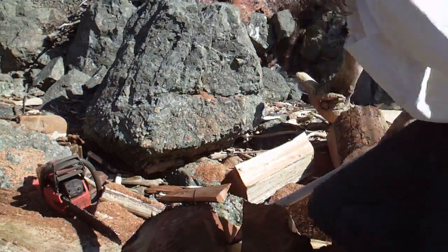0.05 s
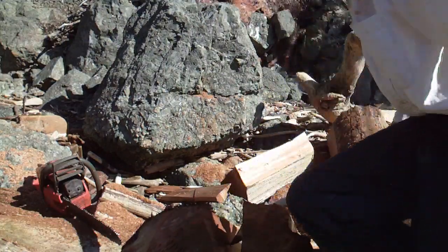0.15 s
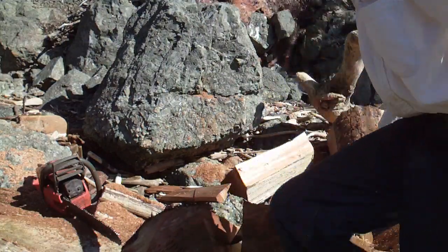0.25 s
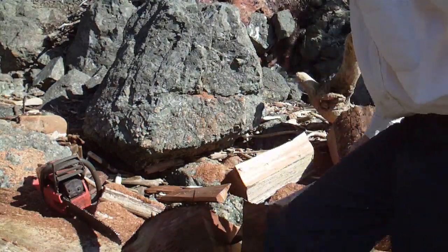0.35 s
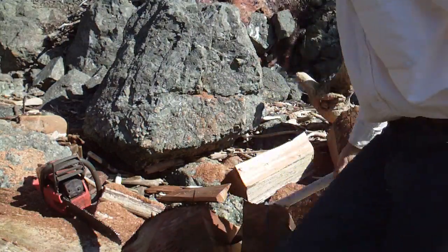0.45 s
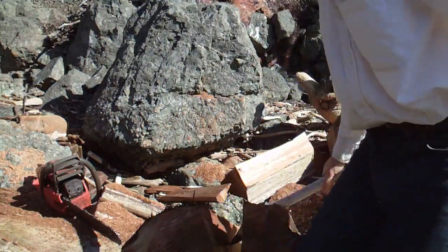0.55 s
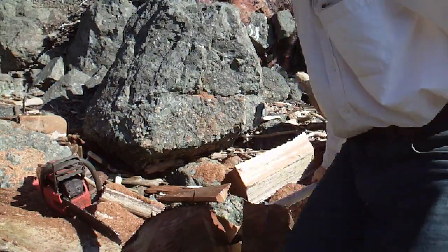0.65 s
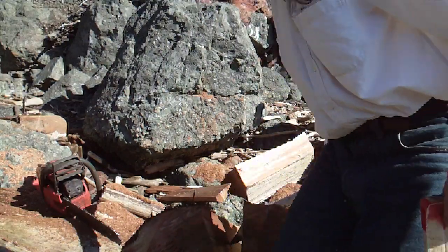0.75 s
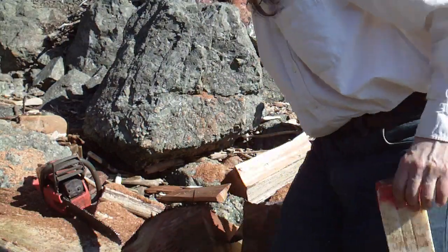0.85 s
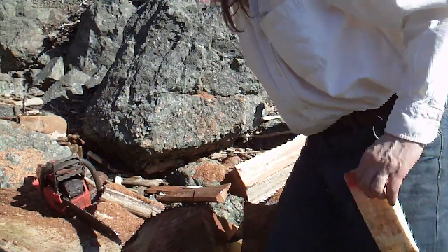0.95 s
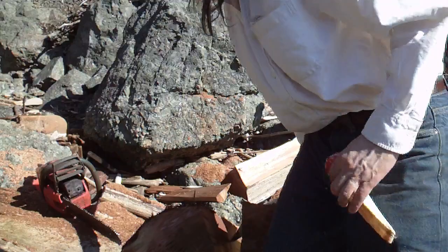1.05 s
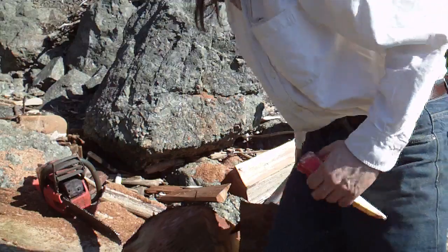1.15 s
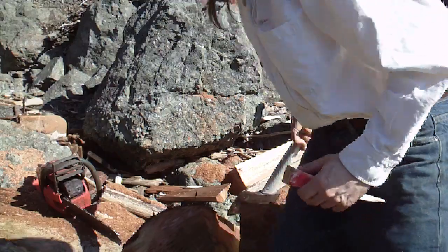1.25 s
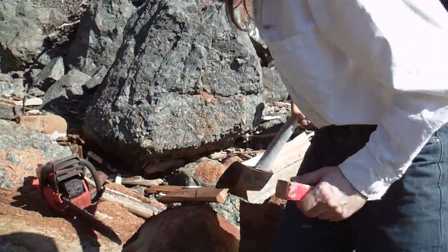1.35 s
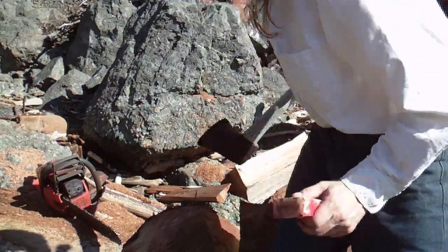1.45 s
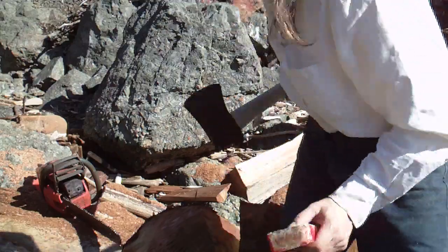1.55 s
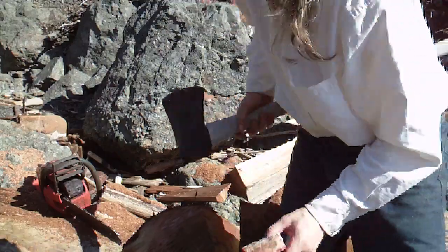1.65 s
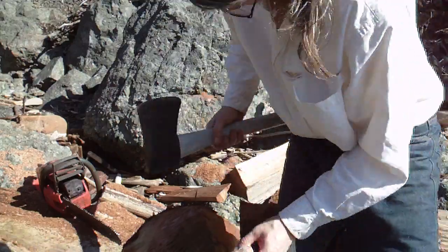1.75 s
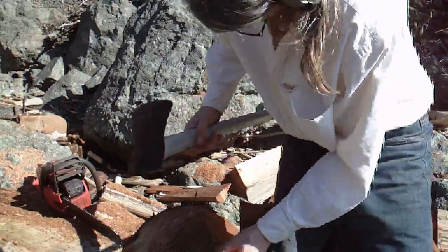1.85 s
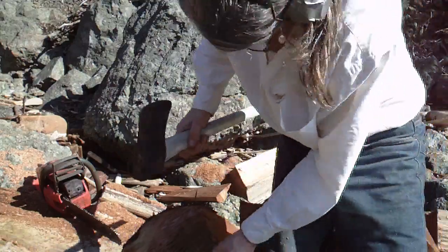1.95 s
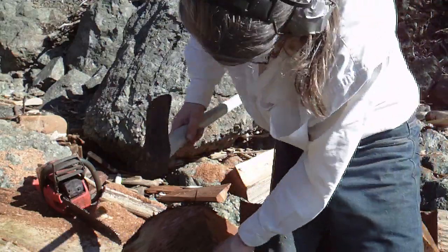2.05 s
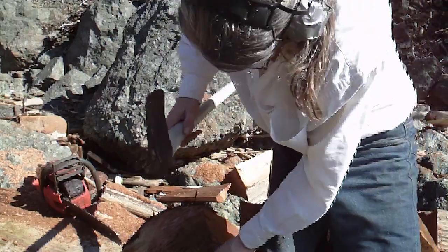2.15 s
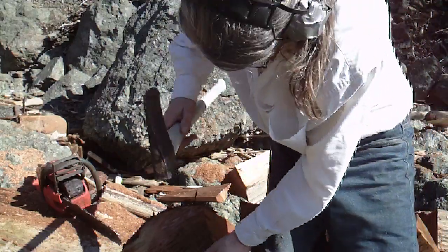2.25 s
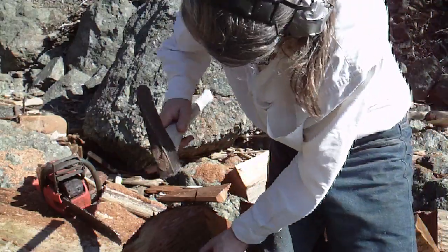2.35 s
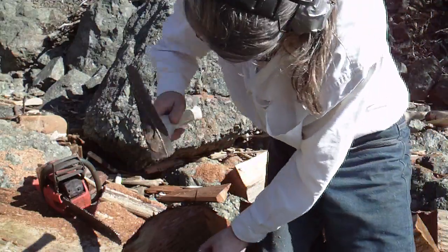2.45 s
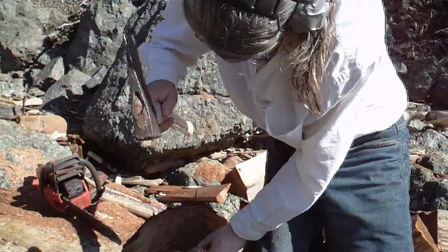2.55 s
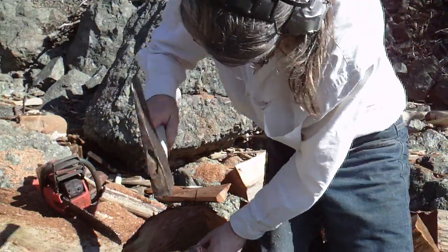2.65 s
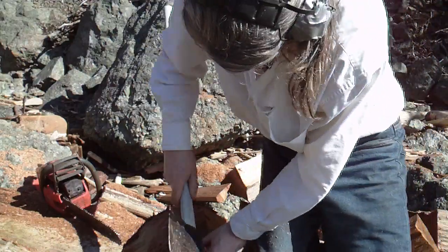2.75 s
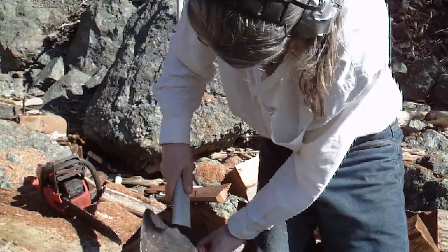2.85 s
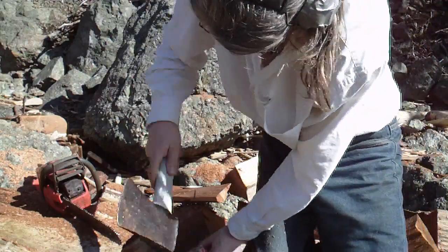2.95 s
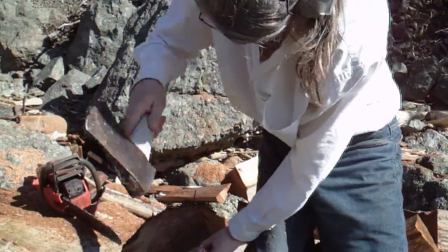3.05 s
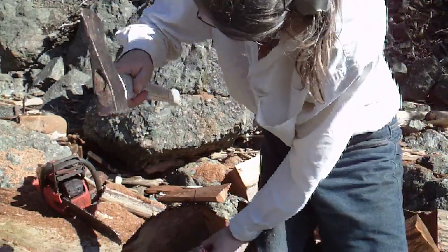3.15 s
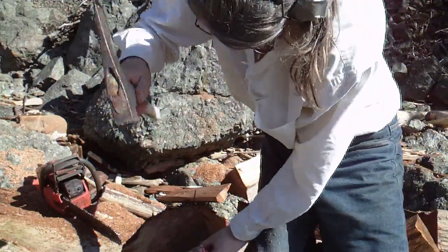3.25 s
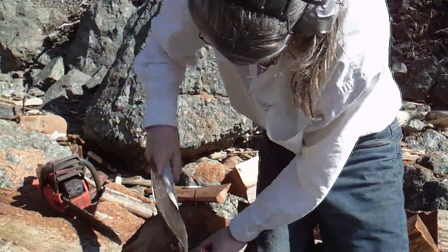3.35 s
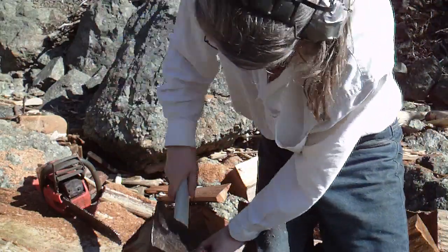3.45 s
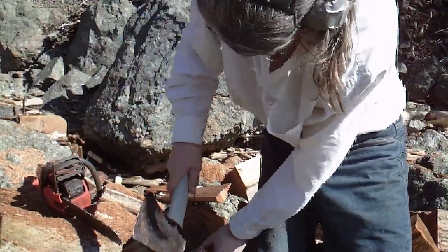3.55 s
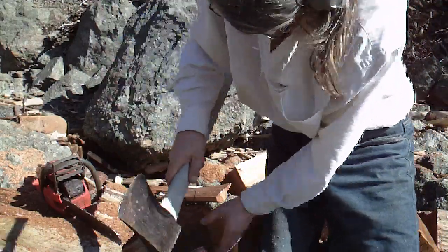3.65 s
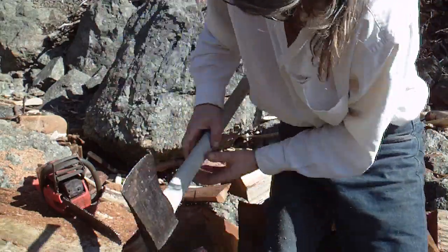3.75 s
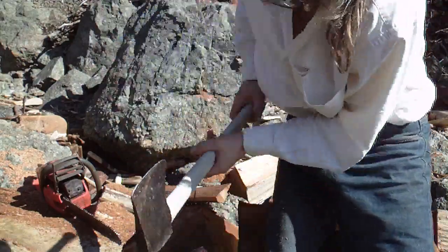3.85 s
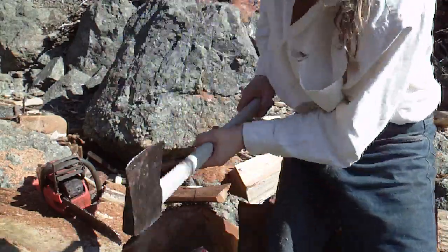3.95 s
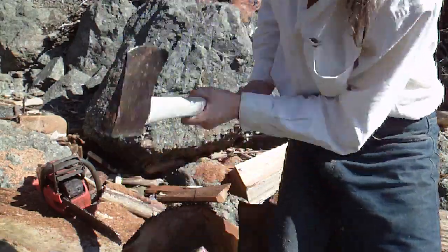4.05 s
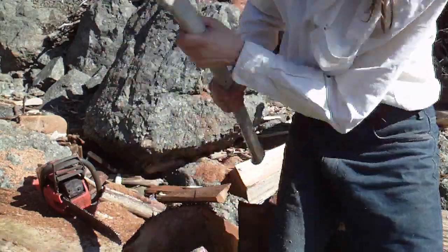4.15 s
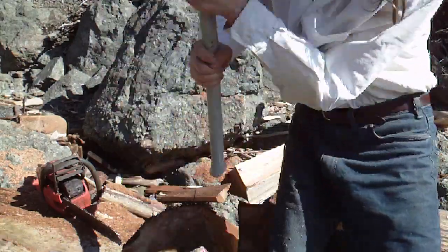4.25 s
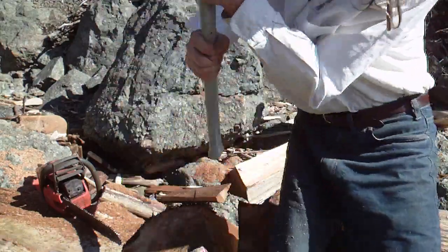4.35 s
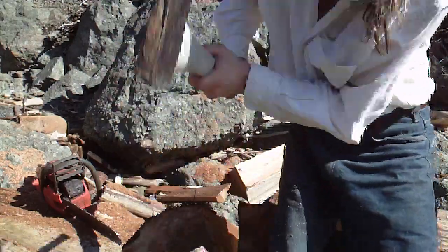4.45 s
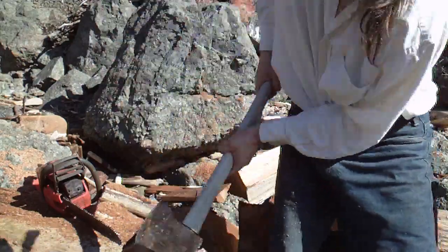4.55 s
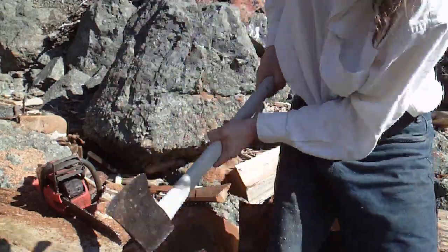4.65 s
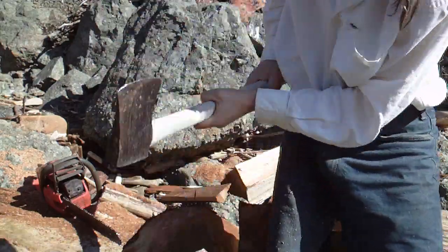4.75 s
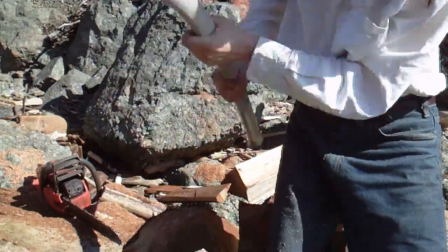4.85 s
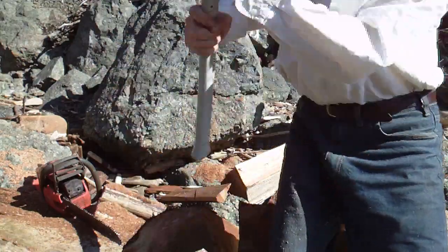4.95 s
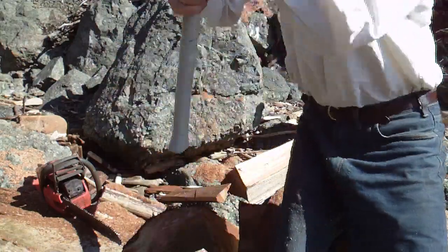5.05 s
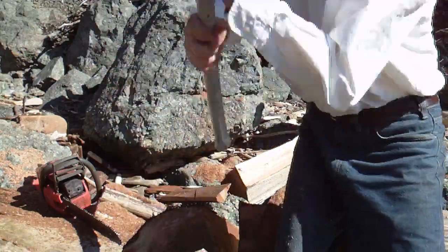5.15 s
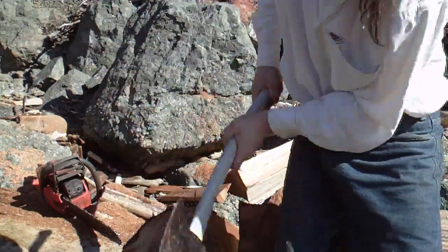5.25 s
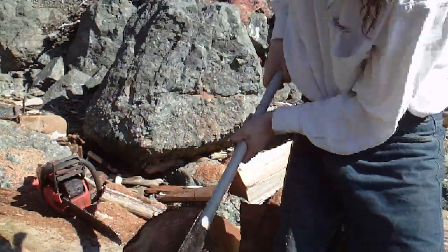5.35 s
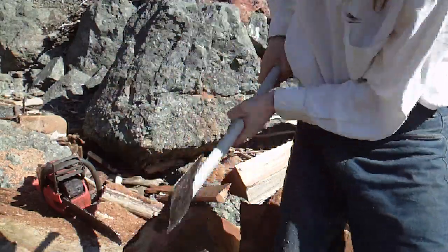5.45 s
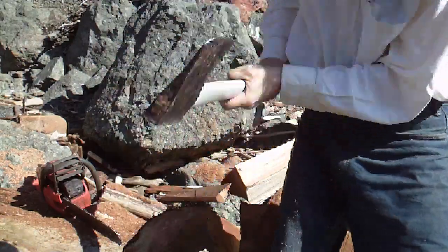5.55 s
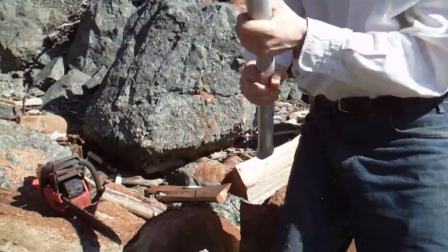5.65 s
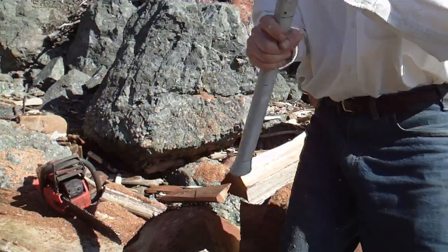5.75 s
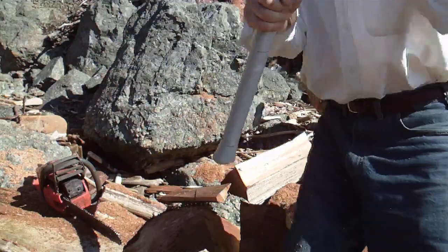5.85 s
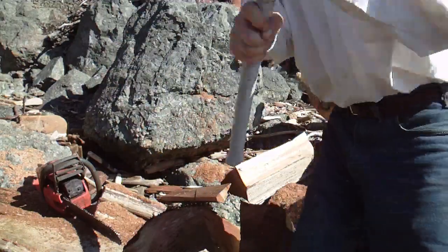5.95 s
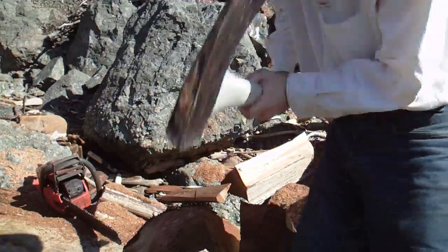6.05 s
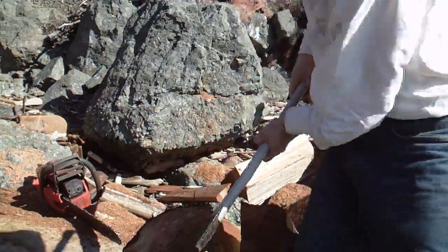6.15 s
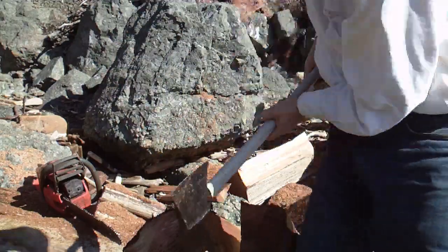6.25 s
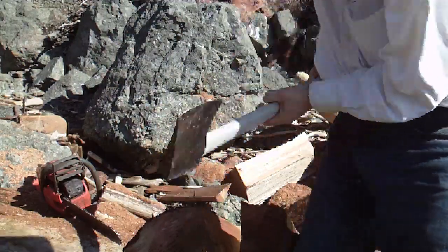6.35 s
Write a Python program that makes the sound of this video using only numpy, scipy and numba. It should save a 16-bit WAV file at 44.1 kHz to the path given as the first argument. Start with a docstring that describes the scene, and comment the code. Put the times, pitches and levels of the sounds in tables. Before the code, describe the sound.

Wood pieces knock and cloth rustles, then five sharp, overloaded hatchet chops crack into wood outdoors, echoing off rocks over soft surf.

```python
"""Hatchet on a beach

A hatchet splits cedar blocks among boulders, close to a small camera. Wood pieces knock and cloth rustles first;
five chops, built from damped modes and torn noise, overload the input and echo off rocks and far shore.
Gain control then ducks the filtered-noise surf, the low drone and the camera's own hiss and ticking.
"""
import sys
import numpy as np
from scipy import signal
from scipy.io import wavfile
from scipy.ndimage import uniform_filter1d
from numba import njit

SR = 44100
rng = np.random.default_rng(int(sys.argv[2]) if len(sys.argv) > 2 else 0)


def unload_audio(sound):
    """Save the sound as a 16-bit wav file, at the path given as the first command line argument."""
    columns = np.transpose(np.atleast_2d(sound))
    # keep every value between -1 and 1, then stretch to whole-number steps
    steps = np.round(np.clip(columns, -1, 1) * 32767)
    wavfile.write(sys.argv[1], SR, steps.astype(np.int16))


N = 281799
T = np.arange(N) / SR

# All levels are ahead of the gain control.
# Surf spectrum. Each row: frequency in Hz, relative density in dB per Hz.
SURF_SPECTRUM = [(25, 11.5), (50, 1), (90, 0), (140, -3), (250, -13.5), (600, -16), (1200, -23.5),
                 (2200, -24), (4000, -31.5), (7000, -32), (10000, -43.5), (12000, -37), (14500, -36.5)]
SURF_DB = -42
# Drone level. Each row: time in seconds, level in dB.
DRONE_LEVELS = [(0.0, -39.5), (0.73, -45), (1.8, -45), (2.1, -50.5), (3.06, -43), (3.4, -55.5),
                (3.83, -60.5), (4.3, -45.5), (5.05, -58), (5.5, -39.5), (5.65, -50.5), (6.39, -40)]
DRONE_HZ, DRONE_WIDTH_HZ, DRONE_STEADY_DB = 77, 13, 0
CAMERA_HZ, CAMERA_PULSES_PER_S, CAMERA_START_S, CAMERA_DB = 7800, 10, .05, -58
# Cloth and hands moving. Each row: loudest at in seconds, rise in seconds, fall in seconds,
# dull rustle in dB, bright rustle in dB.
MOVES = [(.015, 0.19, .1, -40, -60), (.1, .1, .2, -48, -60), (.22, 0.056, 0.25, -46, -58),
         (.72, 0.14, 0.28, -44, -56), (.97, 0.073, 0.14, -49.5, -56), (1.2, 0.2, .08, -47, -59),
         (1.3, 0.088, 0.071, -39.5, -49), (1.6, 0.31, 0.22, -46, -59.5), (1.82, 0.16, 0.54, -54, -64),
         (2.6, 0.27, .4, -55.5, -68), (4.03, 0.13, 0.21, -40.5, -60), (4.22, 0.21, 0.28, -48.5, -58),
         (4.62, 0.14, 0.059, -44, -69), (5.17, 0.23, 0.28, -42.5, -63), (5.359, .2, 0.073, -40, -61),
         (5.65, .2, .2, -50, -56), (5.91, .1, .15, -38, -52), (6.101, 0.25, 0.9, -44, -59.5)]
# Colour of the dull rustle. Each row: centre in Hz, width in Hz, relative level in dB.
CLOTH_PEAKS = [(445, 680, 1.5), (1340, 600, 3.5), (2730, 1400, -7)]
# Bright ticks of grit and splinters. Each row: start in seconds, peak in dB, centre in Hz, width in Hz,
# decay length in seconds.
TICKS = [(.005, -34.5, 1670, 1130, 0.013), (0.091, -27, 7700, 9050, 0.0038),
         (0.245, -26.5, 2740, 4760, 0.0042), (0.52, -34, 8000, 9000, 0.0025),
         (0.733, -29, 2800, 4850, 0.0035), (1.027, -29, 5900, 7000, 0.0025),
         (1.267, -34, 3000, 7000, 0.0016), (3.319, -38, 2200, 1800, 0.0046),
         (5.255, -27.5, 4020, 9100, 0.0067)]
# Small knocks of wood. Each row: start in seconds, clack in dB, clack in Hz, thump in dB, thump in Hz,
# snap in dB. Clack and thump levels are peaks before the soft-contact low-pass.
KNOCKS = [(.6422, -9.5, 805, -14.5, 245, -17), (0.667, -23, 900, -21, 230, -52),
          (.731, -27, 1470, -46, 300, -29.5), (0.937, -28.5, 1300, -41, 201, -35),
          (1.006, -28, 930, -53, 200, -48), (1.0334, -16.5, 1430, -36, 302, -53),
          (1.0462, -19, 1620, -43, 300, -52), (1.068, -54, 600, -29.5, 149, -57),
          (1.1134, -18.5, 1170, -46, 300, -56), (1.1697, -22.5, 870, -16.5, 204, -49),
          (1.203, -22.5, 960, -17.5, 240, -56), (1.592, -47, 696, -26, 236, -57),
          (2.204, -55, 500, -33, 200, -55), (4.396, -30.5, 550, -53, 202, -65),
          (4.966, -40, 733, -57, 302, -62), (5.257, -23.5, 880, -40, 297, -32),
          (5.376, -18, 745, -32, 295, -64), (6.211, -27, 900, -29, 413, -55),
          (6.246, -12, 690, -4, 380, -40), (6.278, -31, 1250, -7.5, 290, -40),
          (6.31, -30, 1080, -13, 433, -45)]
THUMP_T60_CYCLES = 7.9
# Rubs of the steel head. Each row: loudest at in seconds, rise in seconds, fall in seconds, level in dB.
RUBS = (1.3, 0.14, 0.098, -40), (1.64, 0.24, 0.098, -47.5), (1.9, .2, 0.34, -61)
# Resonances of the rubbed steel, one list for the scrape and one for the strokes.
# Each row: centre in Hz, width in Hz, relative level in dB per pass (two passes).
STEEL_PEAKS = [(645, 130, 2), (1450, 400, 1.5), (3480, 130, -0.5), (5170, 320, -2.5), (6450, 170, -3),
               (8700, 540, -6)], [(1780, 110, 0)]
# Squeak swell, one row: loudest at in seconds, rise in seconds, fall in seconds, level in dB before flutter.
SQUEAK_SWELL = (1.33, .08, .06, -42)
SQUEAK_HZ, SQUEAK_OCTAVES_PER_S = 450, -19  # pitch at the loudest moment, glide
# Chops. Each row: start in seconds, blow gain in dB, main pitch of the block in Hz, sharpness in dB per octave,
# thud peak in dB, shaft ring in Hz, then relative to the blow gain: crack, ring, rock echo, splinter hiss
# and low shore echo, each in dB.
CHOPS = [(2.877, 4.5, 1273, 1, -5.5, 545, 2, -41, -25.5, -37.5, -43.5),
         (3.513, 4, 1236, 5, -5, 450, 8.5, -17, -25.5, -37, -45),
         (4.645, 6, 1242, 4, -10.5, 545, 7, -4, -23, -41, -38.5),
         (5.391, 8, 1222, -1, -5, 545, 11, -50, -22.5, -30, -41),
         (6.2315, 11.5, 1190, -6, -4.5, 495, 7, -17, -24, -35, -46)]
# Block modes. Each row: multiple of the main pitch, relative level in dB before sharpness, t60 in seconds.
BLOCK_MODES = [(.55, -29, 0.038), (.75, -20, 0.063), (.87, -3.5, 0.018), (1, 10.5, 0.016),
               (1.17, -1.5, 0.038), (1.299, 4, 0.019), (1.47, 9, 0.014), (1.751, 5, 0.024),
               (2.05, -18, 0.052), (2.25, -27, 0.051), (2.549, 5.5, 0.015), (1.6, -10.5, 0.031),
               (1.9, 0, 0.012), (3.1, -48, 0.0037)]
# Modes of the log underneath. Each row: frequency in Hz, relative level in dB, t60 in seconds.
LOG_MODES = [(109, 7, 0.079), (195.3, 12, 0.12), (315, 1, 0.16), (394, -9, 0.07)]
# Steel head ring. Each row: frequency in Hz, level in dB relative to the blow gain, t60 in seconds.
HEAD_MODES = [(1340, -27, 0.39), (1490, -42, 0.33), (2480, -48, 0.21), (2990, -36, 0.41), (3450, -42, 0.72)]
# Splinter hiss. Each row: centre in Hz, width in Hz, level in dB relative to the chop's hiss, t60 in seconds.
SPLINTERS = [(4500, 2850, -2, 0.61), (5580, 600, 3, 0.13), (7050, 2200, -1, 0.31), (8400, 1170, -6.5, 0.17),
             (13360, 9000, -7.5, 0.47)]
# Single boulders returning the blow. Each row: delay in seconds, peak in dB relative to the blow gain.
BOULDERS = [(0.012, -2.5), (0.046, -54.5), (.088, -32)]
# Colour of the rock echoes. Each row: centre in Hz, width in Hz, relative level in dB.
ROCK_PEAKS = [(450, 1370, 6.5), (1444, 515, 15.5), (1775, 350, -12), (2200, 1100, 3.5), (3300, 310, 13),
              (3870, 750, 1)]
# Colour of the low and of the high shore echo, one list each.
# Each row: centre in Hz, width in Hz, relative level in dB.
SHORE_PEAKS = [(486, 1400, -20.5), (1290, 215, 2), (1470, 230, -6.5)], [(2600, 750, -6.5), (3090, 157, 2.5),
               (3250, 66, 1), (3670, 150, -6.5), (4300, 1300, -23), (6850, 810, -30.5)]
TEAR_S, BLOCK_PEAK_DB = .0053, 23.4
SHAFT_T60_S, HUM_T60_S, HUM_DB = 0.095, 1.5, -37  # fast part; slow part, relative to the ring
ROCK_T60_S, SHORE_T60_S, SHORE_HIGH_DB = .46, 2.47, -40
OVERLOAD, OVERLOAD_RELEASE_S = .5, .0096
DUCK_DB, DUCK_ATTACK_S, DUCK_RELEASE_S = 9.5, 0.11, 0.29  # deepest duck, time constants
LOW_CUT_HZ, TOP_HZ = 62.5, 15300


def undb(db):
    """Decibels to amplitude."""
    return 10 ** (np.asarray(db) / 20)


def level(x, db):
    """Scale to an RMS level."""
    return x * undb(db) / np.sqrt(np.mean(x ** 2))


def peak(x, db):
    """Scale to a peak level."""
    return x * undb(db) / np.abs(x).max()


def band(x, hz, width_hz):
    """Band-pass resonance, gain 1 at the centre."""
    return signal.lfilter(*signal.iirpeak(min(hz, .45 * SR), hz / width_hz, SR), x)


def colour(x, peaks):
    """A sum of resonances with alternating sign."""
    return sum((-1) ** k * undb(db) * band(x, hz, width_hz) for k, (hz, width_hz, db) in enumerate(peaks))


def fade(t, t60_s):
    """Exponential decay, 60 dB in t60_s."""
    return np.exp(-np.log(1000) * t / t60_s)


def ring(t, modes):
    """Response of damped modes to one tap."""
    return sum(undb(db) * fade(t, t60_s) * np.sin(2 * np.pi * hz * t) for hz, db, t60_s in modes)


def add(out, x, start_s):
    """Mix x into out, cut at the end."""
    i = int(start_s * SR)
    out[i:i + len(x)] += x[:N - i]


def walk(rate_hz):
    """Random levels held 1 / rate_hz seconds and smoothed twice; standard deviation about 0.85."""
    k = int(SR / rate_hz)
    held = np.repeat(rng.standard_normal(N // k + 1), k)
    return 1.14 * uniform_filter1d(uniform_filter1d(held, k), k)[:N]


def swell(top_s, rise_s, fall_s, db):
    """Gain that climbs 20 dB to its top within the rise time and drops 20 dB within the fall time."""
    before = (top_s - T) / max(rise_s, .01)
    after = (T - top_s) / max(fall_s, .01)
    return undb(db - 20 * np.where(T < top_s, before, after))


def echo(t, sound, t60_s, db):
    """Scattered, uneven returns that build up over about a millisecond and die away."""
    uneven = undb(1.5 * walk(70)[:len(t)])
    build_up = 1 - np.exp(-t / 0.00078)
    return level(sound, db) * uneven * fade(t, t60_s) * build_up


def surf():
    """Noise bands half an octave apart swell together and flicker alone."""
    out, common = 0, walk(1.0)
    hz_points, db_points = np.transpose(SURF_SPECTRUM)
    for hz in 30 * 2 ** np.arange(0, 9.1, .5):
        db = np.interp(np.log(hz), np.log(hz_points), db_points) + 0.71 * common + 2.4 * walk(24.05)
        noise = rng.standard_normal(N)
        out = out + undb(db) * band(band(noise, hz, hz / 2), hz, hz / 2)
    return level(out, SURF_DB)


def drone():
    """Narrow low noise plus a tone of wavering pitch, following the level table."""
    noise = band(rng.standard_normal(N), DRONE_HZ, DRONE_WIDTH_HZ)
    rough = band(noise, DRONE_HZ, 2 * DRONE_WIDTH_HZ)
    hz = DRONE_HZ + 4.05 * walk(14)
    steady = np.sin(2 * np.pi * np.cumsum(hz) / SR)
    mix = level(rough, 0) + level(steady, DRONE_STEADY_DB)
    return level(mix, 0) * undb(np.interp(T, *np.transpose(DRONE_LEVELS)))


def camera():
    """A faint high whine inside the camera pulses ten times a second, over constant hiss and a narrow line."""
    phase = (T - CAMERA_START_S) * CAMERA_PULSES_PER_S % 1
    pulse = np.exp(-(phase / 0.13) ** 4)
    whine = level(band(rng.standard_normal(N), CAMERA_HZ, 120), 0)
    hiss = level(band(band(rng.standard_normal(N), 8120, 1100), 8120, 1100), -7)
    line = level(band(rng.standard_normal(N), 6050, 58.8), -15)
    return undb(CAMERA_DB) * (whine * pulse + hiss + line)


def cloth():
    """Dense uneven grains of friction; a dull and a bright part swell with each movement."""
    grains = rng.standard_normal((2, N)) * undb(3.0 * walk(150))
    dull = level(band(colour(grains[0], CLOTH_PEAKS), 710, 6000), 0)
    bright = level(band(band(grains[1], 6700, 7600), 4800, 9800), 0)
    out = np.zeros(N)
    for top_s, rise_s, fall_s, dull_db, bright_db in MOVES:
        rustle = undb(dull_db) * dull + undb(bright_db) * bright
        out += swell(top_s, rise_s, fall_s, 0) * rustle
    return out


def ticks():
    """Grit and splinters: short broad bursts of noise."""
    out, t = np.zeros(N), T[:SR // 10]
    for start_s, db, hz, width_hz, length_s in TICKS:
        burst = rng.standard_normal(len(t)) * np.exp(-(t / length_s) ** 1.6)
        add(out, peak(band(burst, hz, width_hz), db), start_s)
    return out


def knocks():
    """Each knock is a short clack, a low thump and a snap, with a brief scatter off the stones."""
    out, t = np.zeros(N), T[:SR // 4]
    soft_contact = signal.butter(3, 2200, fs=SR, output="sos")  # wood on wood
    for start_s, clack_db, clack_hz, thump_db, thump_hz, snap_db in KNOCKS:
        t60_s = THUMP_T60_CYCLES / thump_hz
        noise = rng.standard_normal((2, len(t)))
        clack = ring(t, [(clack_hz, 0, .018), (1.55 * clack_hz, -5, .012), (0.736 * clack_hz, -7, .02)])
        thump = ring(t, [(thump_hz, 0, t60_s), (1.9 * thump_hz, -9, 0.5 * t60_s)])
        body = signal.sosfilt(soft_contact, peak(clack, clack_db) + peak(thump, thump_db))
        snap = band(band(noise[0] * fade(t, 0.011), 2650, 2100), 2500, 2500)
        scatter = echo(t, band(noise[1], clack_hz, 740), 0.093, clack_db - 22)
        add(out, body + peak(snap, snap_db) + scatter, start_s)
    return out


def steel():
    """Fluttering friction excites narrow resonances: a scrape on many, then two light strokes on one."""
    flutter = undb(1.1 * walk(90))
    sounds = []
    for peaks in STEEL_PEAKS:
        friction = flutter * rng.standard_normal(N)
        sounds.append(level(colour(colour(friction, peaks), peaks), 0))
    scrape, stroke = sounds
    return swell(*RUBS[0]) * scrape + sum(swell(*rub) for rub in RUBS[1:]) * stroke


def squeak():
    """A tone of fluttering level whose pitch drops quickly."""
    octaves = np.clip(SQUEAK_OCTAVES_PER_S * (T - SQUEAK_SWELL[0]), -1, .5)
    tone = np.sin(2 * np.pi * np.cumsum(SQUEAK_HZ * 2 ** octaves) / SR)
    return swell(*SQUEAK_SWELL) * undb(3.0 * walk(120)) * tone


def chops():
    """The edge lands, fibres tear for milliseconds and drive the block; the log thuds, rocks and shore answer."""
    out, t = np.zeros(N), T[:2 * SR]
    for (start_s, blow_db, block_hz, sharp_db, thud_db, ring_hz,
         crack_db, ring_db, rock_db, hiss_db, shore_db) in CHOPS:
        tear, near, far, hiss = rng.standard_normal((4, len(t)))
        tear *= np.exp(-(t / TEAR_S) ** 2) * (1 - np.exp(-t / 0.00079))
        landing = 2.6 * np.exp(-((t[:2000] - .0002) / .0001) ** 2)  # one short push
        push = tear[:2000] - landing
        modes = [(m * block_hz, db + sharp_db * np.log2(m), t60_s) for m, db, t60_s in BLOCK_MODES]
        block = signal.fftconvolve(push, ring(t, modes))[:len(t)]
        blow = peak(block, BLOCK_PEAK_DB) + peak(band(tear, 4560, 2100), crack_db)
        for delay_s, back_db in BOULDERS:
            add(out, peak(colour(blow, ROCK_PEAKS), blow_db + back_db), start_s + delay_s)

        # the heavy log takes a moment to move
        log = -peak(ring(t, LOG_MODES) * (1 - np.exp(-t / 0.0013)), thud_db)
        blow += ring(t, [(ring_hz, ring_db, SHAFT_T60_S)] + HEAD_MODES)
        hum = ring(t, [(ring_hz, ring_db + HUM_DB, HUM_T60_S)])
        blow += hum * undb(2 * walk(23)[:len(t)])
        blow += echo(t, colour(near, ROCK_PEAKS), ROCK_T60_S, rock_db)
        for hz, width_hz, db, t60_s in SPLINTERS:
            spray = band(band(hiss, hz, width_hz), hz, 2 * width_hz)
            blow += echo(t, spray, t60_s, hiss_db + db)
        blow += echo(t, colour(far, SHORE_PEAKS[0]), SHORE_T60_S, shore_db)
        shore_high = echo(t, colour(far, SHORE_PEAKS[1]), SHORE_T60_S, SHORE_HIGH_DB)
        add(out, undb(blow_db) * blow + log + shore_high, start_s)
    return out


def scene():
    """Sum of all sources, one channel."""
    mix = surf() + drone() + camera() + cloth() + ticks() + knocks() + steel() + squeak() + chops()
    return mix[None]


@njit
def follow(x, attack, release):
    """Envelope with separate rise and fall, each a fraction of the gap per sample."""
    y, e = np.empty(len(x)), 0.
    for i in range(len(x)):
        e += (x[i] - e) * (attack if x[i] > e else release)
        y[i] = e
    return y


def record(dry):
    """An overload pulls the gain down for a while; the input clips; deepest bass and top are cut."""
    over = follow(1. * (np.abs(dry[0]) > OVERLOAD), 0.65, 1 / (OVERLOAD_RELEASE_S * SR))
    duck = follow(over, 1 / (DUCK_ATTACK_S * SR), 1 / (DUCK_RELEASE_S * SR))
    duck = 1 - (1 - duck / duck.max()) ** 2  # the gain holds before it recovers
    clipped = np.clip(dry * undb(-DUCK_DB * duck), -1, 1)
    low_cut = signal.butter(3, LOW_CUT_HZ, "high", fs=SR, output="sos")
    top_cut = signal.ellip(10, .2, 60, TOP_HZ, fs=SR, output="sos")
    return signal.sosfilt(top_cut, signal.sosfilt(low_cut, clipped))


dry = scene()
out = record(dry)
unload_audio(out)
```